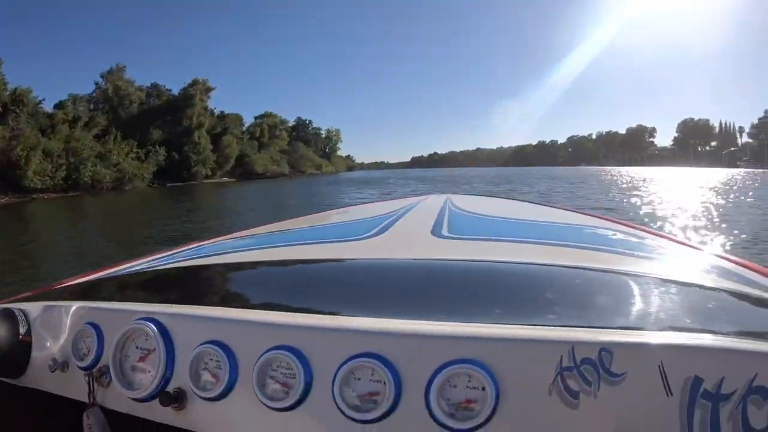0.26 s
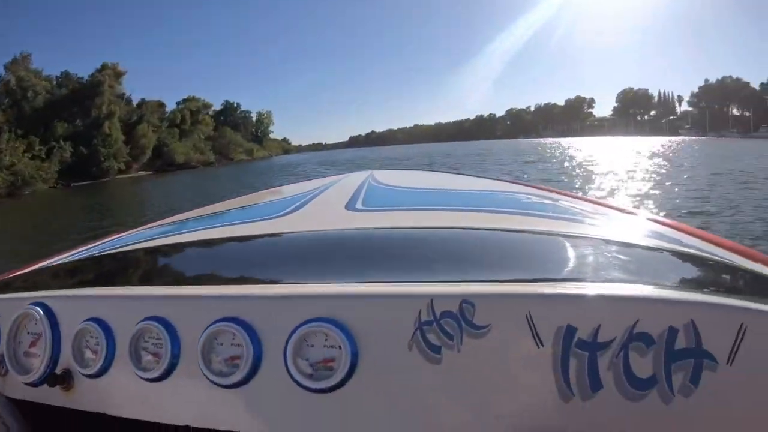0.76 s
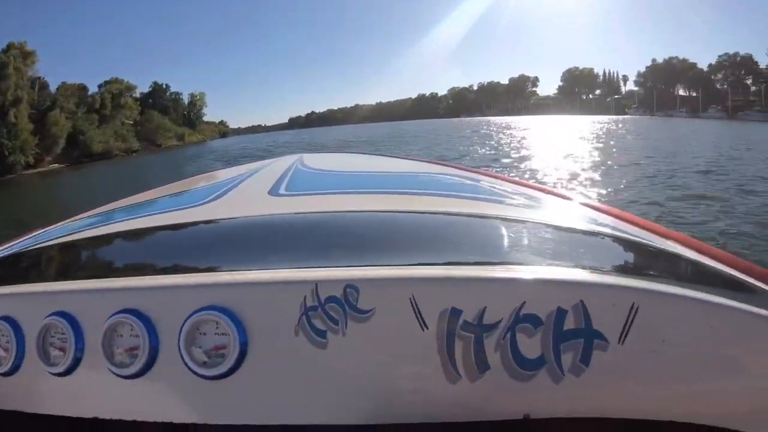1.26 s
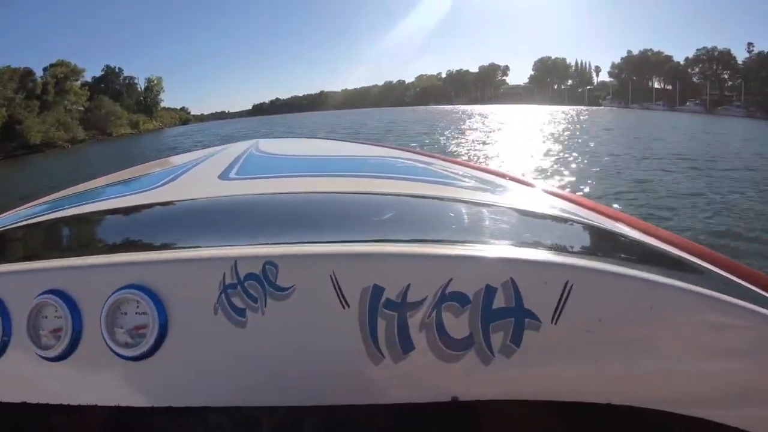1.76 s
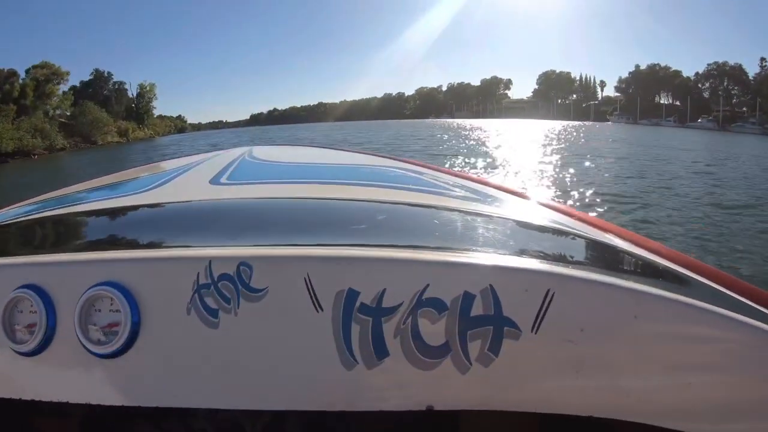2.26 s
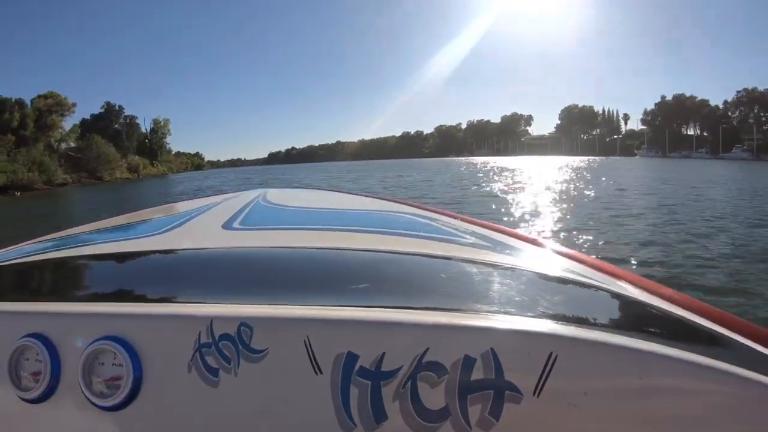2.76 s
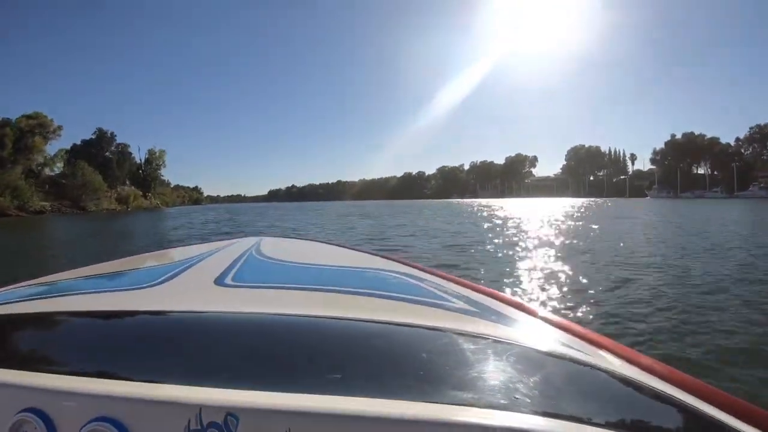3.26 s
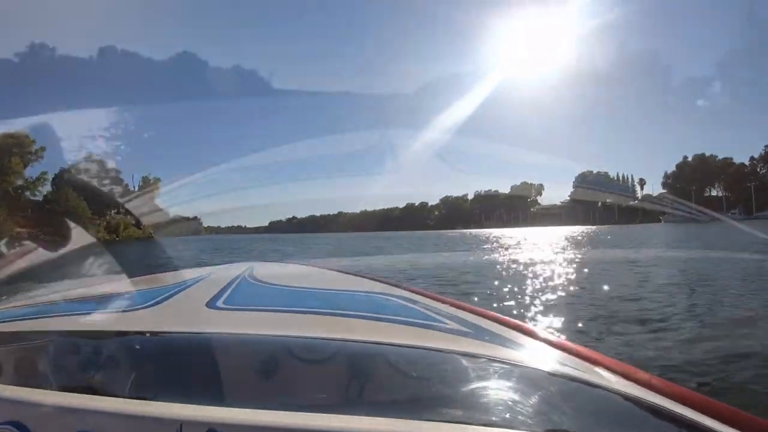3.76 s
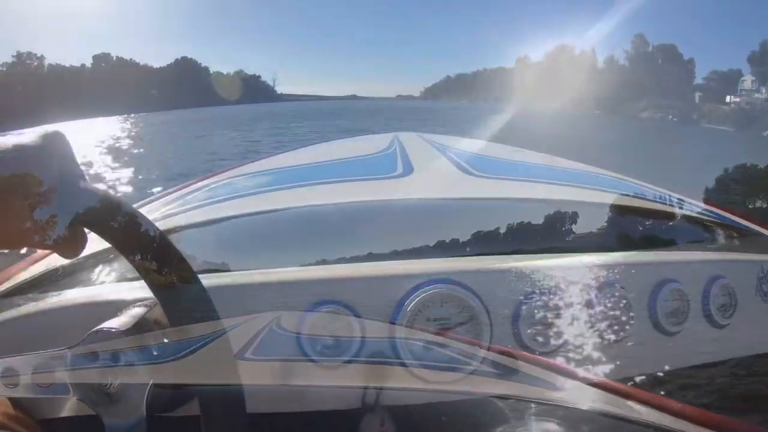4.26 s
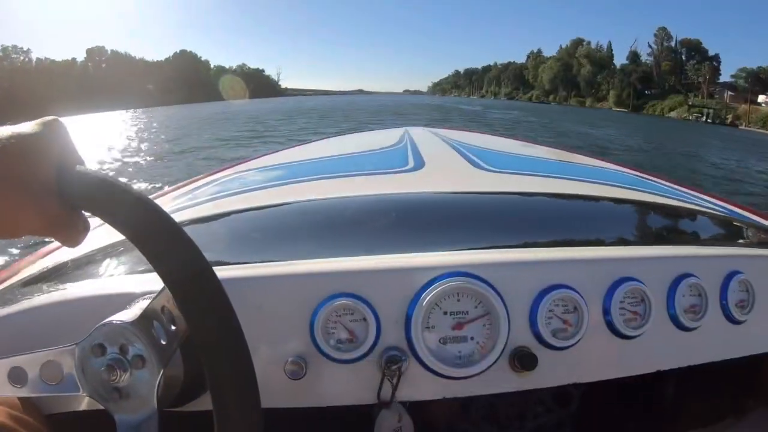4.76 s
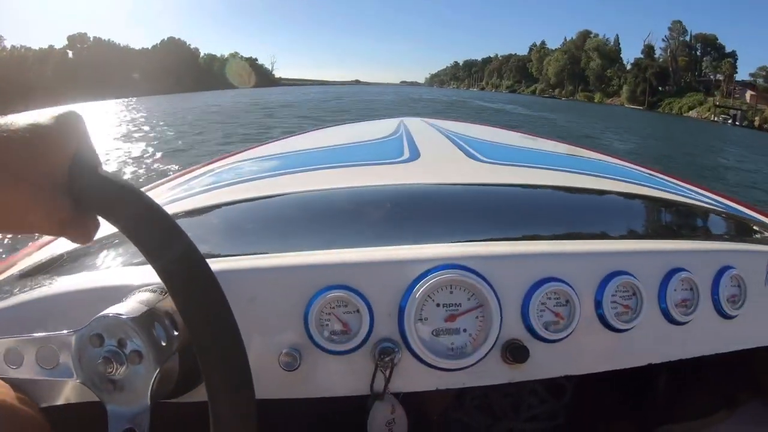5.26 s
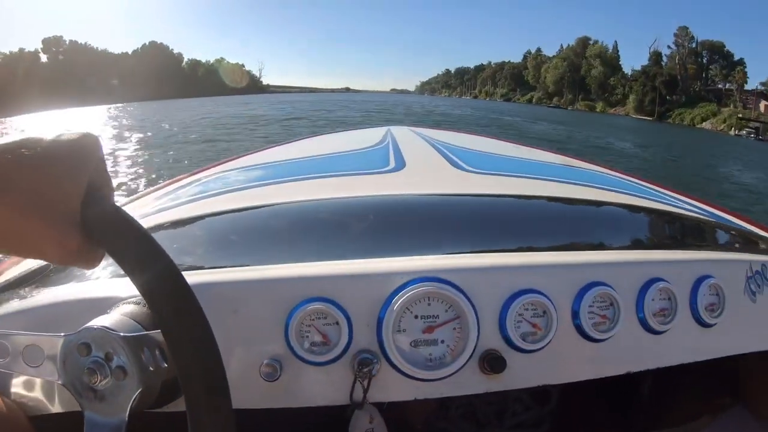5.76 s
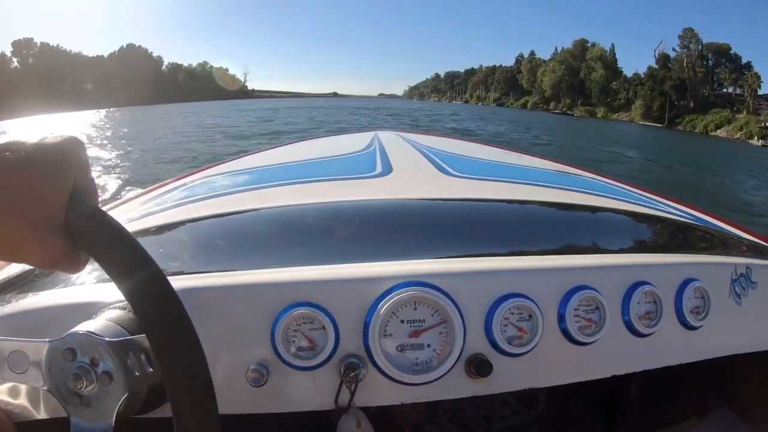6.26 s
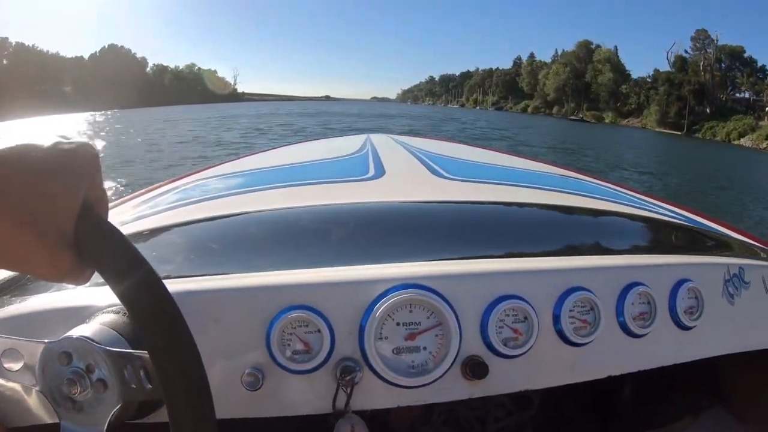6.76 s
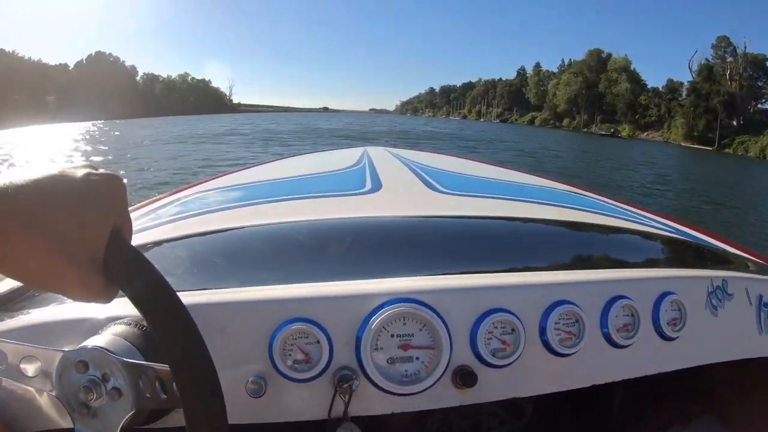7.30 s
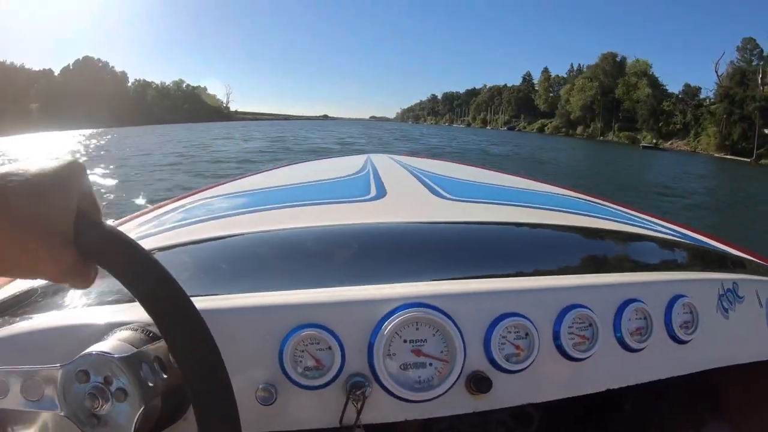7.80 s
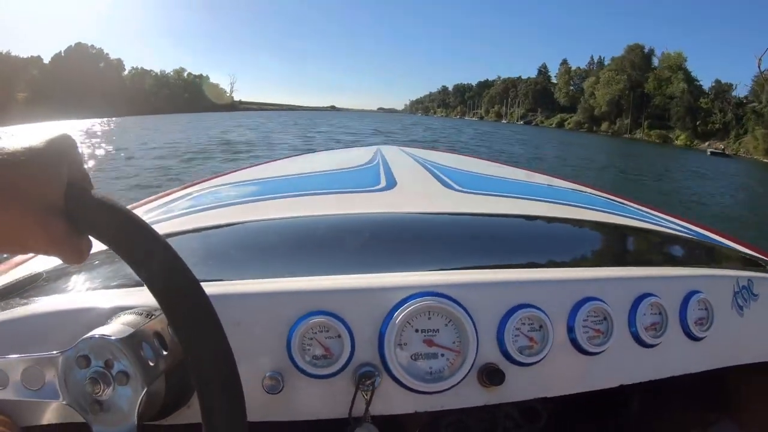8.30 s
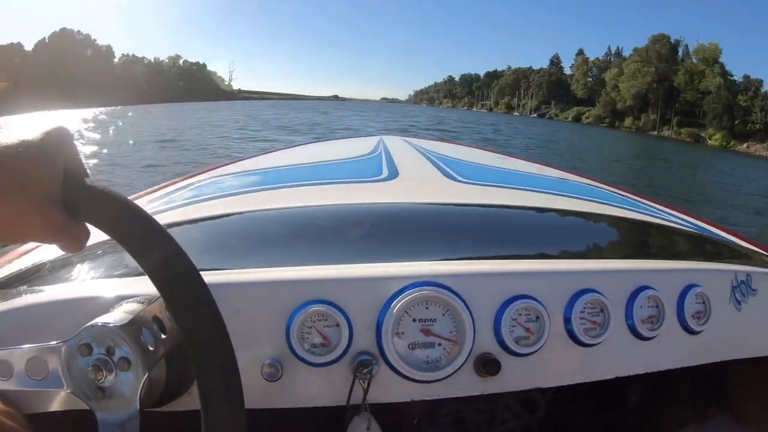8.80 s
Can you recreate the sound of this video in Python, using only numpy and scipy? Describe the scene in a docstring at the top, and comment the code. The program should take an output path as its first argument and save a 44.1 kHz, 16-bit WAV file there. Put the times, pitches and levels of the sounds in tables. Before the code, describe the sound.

From an open cockpit, a steady booming boat engine with light water slaps blends into a louder rushing cruise, then revs up quickly and holds.

```python
"""V8 jet boat on a river

Heard from the cockpit. At easy speed the hull booms on one engine order and the valves tick; this dissolves
into a faster stretch in which the throttle opens. The engine is built from sines on multiples of its cycle.
Wind buffets the microphone, exhaust and wake roar, spray hisses and fizzes along the hull: all shaped noise.
Sheets of water slapping the hull are short bursts of noise."""
import sys
import numpy as np
from scipy import signal
from scipy.fft import rfft, irfft
from scipy.io import wavfile
from scipy.ndimage import uniform_filter1d

SR = 44100
rng = np.random.default_rng(int(sys.argv[2]) if len(sys.argv) > 2 else 0)


def to_wav(sig):
    """Store sig (one row per channel, or 1-D mono) as 16-bit WAV at the path in sys.argv[1].

    Samples outside -1..1 are clipped; the rate is SR.
    """
    pcm = np.clip(np.atleast_2d(sig), -1, 1) * 32767
    pcm = np.round(pcm).astype(np.int16)
    wavfile.write(sys.argv[1], SR, pcm.T)  # frames by channels


def volts_from_db(level):
    """Convert decibel levels to linear amplitude ratios."""
    exponent = np.asarray(level, float) / 20
    return 10 ** exponent


N = 398663  # length in samples

# rush of water and exhaust past the boat: time_s, roar_db, spray_db, fizz_db
RUSH = [(0.0, -37, -53, -66), (0.15, -28.5, -49.5, -64), (0.7, -33.5, -49.5, -62.5),
        (1.08, -34, -50, -57.5), (1.34, -31, -52, -55.5), (1.56, -30.5, -38.5, -57.5),
        (1.72, -30.5, -45.5, -62), (1.85, -35, -52, -65), (2.62, -39.5, -52.5, -67.5),
        (2.97, -36.5, -47.5, -63.5), (3.6, -36.5, -52.5, -64), (3.93, -33, -45.5, -65.5),
        (4.6, -27, -40.5, -67), (5.22, -25.5, -40.5, -67), (5.5, -27.5, -42.5, -67.5),
        (6.36, -27.5, -44.5, -67), (6.63, -26, -36.5, -58.5), (7.08, -23.5, -37.5, -51.5),
        (7.3, -28, -40, -53), (7.75, -27.5, -36, -53), (8.43, -29, -37.5, -59), (9.04, -27.5, -37.5, -58)]
# how far the microphone has swung round: time_s, share (0-1)
FACING = [(0, 0.7), (1.5, 0.14), (1.95, 0), (3.15, 0.27), (3.35, .95), (4.6, 0.83)]


def evened(x):
    """Scales to an rms of 1."""
    return x / np.sqrt(np.mean(x ** 2) + 1e-20)


def shape(points, hz):
    """Gain of a spectrum table, read along log frequency and all but silent beyond its ends."""
    f, db = np.transpose(points)
    return volts_from_db(np.interp(np.log(hz + 1), np.log(f + 1), db, -120, -120))


def tint(x, points):
    """Filters by a spectrum table."""
    hz = np.fft.rfftfreq(len(x), 1 / SR)
    return irfft(rfft(x) * shape(points, hz), len(x))


def curves(rows, t):
    """Columns of a curve table at times t."""
    s, *columns = np.transpose(rows)
    return [np.interp(t, s, c) for c in columns]


def wander(count, rate):
    """Slow random curves of rms 1, changing about rate times a second."""
    knots = rng.standard_normal((count, 2000))  # 200 per second
    knots = uniform_filter1d(knots, max(round(100 / rate), 1), axis=1)
    at = np.arange(N) * 200 / SR
    return [np.interp(at, np.arange(2000), evened(k)) for k in knots]


def dissolve(t):
    """Share of the fast stretch, 0 to 1."""
    # span of the dissolve: start_s, end_s
    span = 3.37, 4.62
    start_s, end_s = span
    return np.clip((t - start_s) / (end_s - start_s), 0, 1)


def tones(rate, order_db, waver_db, slip):
    """Sines on the multiples of the cycle; uneven burning makes each waver in size (dB) and phase (rad)."""
    turns = 2 * np.pi * np.cumsum(rate) / SR
    sizes = wander(count=len(order_db), rate=9)
    phases = wander(count=len(order_db), rate=5)
    starts = 2 * np.pi * rng.random(len(order_db))
    total = np.zeros(N)
    for k, (db, size, phase, start) in enumerate(zip(order_db, sizes, phases, starts)):
        total += volts_from_db(db + waver_db * size) * np.sin((k + 1) * turns + start + slip * phase)
    return np.sqrt(2) * total


def easy_orders(t, rate):
    """The fifth order booms in the hull; the other orders change balance as the microphone swings round."""
    # exhaust and hull tones before the swing: cycle_multiple, relative_db
    ahead = [(1, -27), (2, -24), (3, -19.5), (4, -12.5), (5, 0), (6, -24.5), (7, -25.5), (8, -21.5),
             (9, -29), (10, -34.5), (11, -35), (12, -38.5), (13, -31), (14, -28), (15, -32), (16, -36.5),
             (17, -40.5), (18, -35), (19, -39), (20, -37.5), (21, -38.5), (22, -40), (23, -37), (24, -30),
             (25, -32.5), (26, -36), (27, -36), (28, -41), (29, -38), (30, -40.5)]
    # the same tones once the microphone has swung round: cycle_multiple, relative_db
    swung = [(1, -30.5), (2, -24.5), (3, -18.5), (4, -14.5), (5, -1), (6, -19.5), (7, -26), (8, -12.5),
             (9, -26.5), (10, -30), (11, -26), (12, -32.5), (13, -22), (14, -17), (15, -30.5), (16, -34.5),
             (17, -38.5), (18, -41.5), (19, -47), (20, -40.5), (21, -33), (22, -37.5), (23, -31),
             (24, -25.5), (25, -34), (26, -36), (27, -29), (28, -37.5), (29, -36), (30, -37.5)]
    # brief swells of the firing order: centre_s, swell_db
    swells = [(1.0, 4), (1.95, 5), (2.45, 13), (2.93, 10), (3.55, 4.7)]
    swell_s, rest_db = 0.13, -4.5  # spread of a swell; offset of the firing order between swells
    facing = np.clip(curves(FACING, t)[0], 0, 1)
    load_db = rest_db + sum(db * np.exp(-((t - s) / swell_s) ** 2) for s, db in swells)
    boom_db = [db if k == 5 else -120 for k, db in ahead[:5]]
    boom = tones(rate, boom_db, waver_db=0.0, slip=0.19)
    order_db = []
    for (k, a), (_, b) in zip(ahead, swung):
        # eight firings a cycle make order 8 the firing order; order 5 is left to the boom
        order_db.append((1 - facing) * a + facing * b + (k == 8) * load_db - (k == 5) * 120)
    return boom + tones(rate, order_db, waver_db=2.2, slip=0.17)


def valve_ticks(t, rate):
    """Each firing adds a short metallic tick of its cylinder's size: a noisy rattle over a ringing valve cover."""
    # valve tick of each cylinder in firing order: relative_db
    cylinders = [-48, -38, -55, -48, -57, -57, -43, -57]
    # spectrum of the ticks: frequency_hz, relative_db_per_hz
    colour = [(3200, -26), (3900, -4), (4500, -6), (5200, -2), (6000, 0), (7000, -19)]
    # gain of the ticks: time_s, gain_db
    gains = [(0, 4.5), (.7, 3), (.82, 11.5), (1.05, 7), (1.2, 3), (2.2, 2.5), (2.5, 5.5), (3, 8),
             (3.65, 6.5), (4.6, 6)]
    firing = np.floor(8 * np.cumsum(rate) / SR).astype(int)
    at = np.flatnonzero(np.diff(firing))
    gate = np.zeros(N)
    gate[at] = volts_from_db(np.take(cylinders, firing[at] % 8) + 2.5 * rng.standard_normal(len(at)))
    burst = np.exp(-np.arange(300) / (0.0014 * SR))  # 1.4 ms decay
    ring = burst * np.sin(2 * np.pi * 5100 * np.arange(300) / SR)
    rattle = signal.oaconvolve(gate, burst)[:N] * rng.standard_normal(N)
    ringing = signal.oaconvolve(gate * rng.choice([-1, 1], N), ring)[:N]
    return volts_from_db(curves(gains, t)[0]) * tint(rattle + 0.6 * ringing, colour)


def easy_engine(t):
    """Engine at easy speed, creeping up; one cycle is two crank turns and eight firings."""
    # engine level: time_s, level_db
    levels = [(0, -13.5), (.5, -14), (1, -12), (1.95, -12.5), (2.2, -11), (2.6, -13), (2.92, -12),
              (3.15, -13), (3.6, -9.5), (4.6, -11)]
    rate = 25.95 + 0.075 * t  # cycles per s
    return volts_from_db(curves(levels, t)[0]) * easy_orders(t, rate) + valve_ticks(t, rate)


def fast_engine(t):
    """The order pattern shifts from cruise to full as the speed rises; load lifts the firing order."""
    # exhaust and hull tones at cruise: cycle_multiple, relative_db
    cruise = [(1, -16), (2, -0.5), (3, -4), (4, -16), (5, -10.5), (6, -23.5), (7, -11.5), (8, -6),
              (9, -9.5), (10, -17.5), (11, -4.5), (12, -18), (13, -8.5), (14, -17.5), (15, -22.5),
              (16, -20), (17, -29), (18, -27.5), (19, -33.5), (20, -27), (21, -29), (22, -32.5), (23, -22),
              (24, -21.5), (25, -20), (26, -20.5), (27, -23.5), (28, -25.5), (29, -27), (30, -24),
              (31, -29), (32, -34.5), (33, -27), (34, -26.5)]
    # exhaust and hull tones at full throttle: cycle_multiple, relative_db
    full_throttle = [(1, -17.5), (2, -0.5), (3, 0), (4, -4), (5, -11), (6, -10), (7, -12), (8, -0.5),
                     (9, -11.5), (10, -10), (11, -14), (12, -17), (13, -14.5), (14, -15), (15, -32),
                     (16, -20.5), (17, -27), (18, -22), (19, -12.5), (20, -18), (21, -17), (22, -25),
                     (23, -17.5), (24, -20), (25, -27), (26, -24.5), (27, -17), (28, -21.5), (29, -22),
                     (30, -23.5), (31, -24), (32, -28), (33, -28.5), (34, -32)]
    # engine speed: time_s, cycles_per_s
    speeds = [(6.92, 29.6), (6.98, 31.2), (7.08, 33.8), (7.17, 34.6), (7.41, 36.7), (7.55, 37.08),
              (7.86, 36.5), (8.33, 37.0), (9.04, 36.76)]
    # engine level: time_s, level_db
    levels = [(3.6, -22.5), (4.6, -25.5), (6.4, -19.5), (6.9, -21.5), (7.16, -19.5), (7.6, -20),
              (9.04, -18.5)]
    cruise_rate, full_rate = 29.6, 36.0  # cycles per s
    throttle_s, surge_db, surge_s = 6.92, 7.5, 0.22  # throttle opens; peak of the load, time to that peak
    rate = curves(speeds, t)[0]
    opened = np.maximum(t - throttle_s, 0) / surge_s
    load_db = surge_db * opened * np.exp(1 - opened)
    full = np.clip((rate - cruise_rate) / (full_rate - cruise_rate), 0, 1)
    order_db = [(1 - full) * a + full * b + (k == 8) * load_db
                for (k, a), (_, b) in zip(cruise, full_throttle)]
    return volts_from_db(curves(levels, t)[0]) * tones(rate, order_db, waver_db=1.2, slip=0.15)


def splashes(t):
    """Sheets of water slap the hull: wide noise that starts at once, holds and drops away."""
    # slaps: start_s, relative_db, length_s
    slaps = [(1.357, -31, .035), (1.41, -31, .07), (1.955, -33, .055), (2.137, -31, .028)]
    # spectrum of the slaps: frequency_hz, relative_db_per_hz
    colour = [(300, -6), (1000, 4.5), (2000, -3.5), (3300, -13), (4200, -8), (6500, -11.5), (7200, -25.5),
              (9500, -47), (15500, -70)]
    gate = sum(volts_from_db(db) * (t > s) / (1 + ((t - s) / length) ** 4) for s, db, length in slaps)
    return uniform_filter1d(gate, size=100) * evened(tint(rng.standard_normal(N), colour))


def rush(size, colour, level, band, patchy_db, flicker_db):
    """Random short-time spectra with drifting patches and gust flicker; level(t) sets the dB in band (Hz)."""
    hop = size // 4
    frames, hz = N // hop + 5, np.fft.rfftfreq(size, 1 / SR)
    t = np.arange(frames) * hop / SR
    real, imaginary, patches = rng.standard_normal((frames, len(hz), 3)).T
    patches = uniform_filter1d(patches, size // 64, axis=0)  # across frequency
    patches = evened(uniform_filter1d(patches, 8192 // size, axis=1))  # across time
    flicker = evened(uniform_filter1d(rng.standard_normal(frames), size=3))
    gain = colour(hz, t)
    inside = (hz > band[0]) & (hz < band[1])
    gain = gain / np.sqrt((gain[inside] ** 2).sum(0))
    gain = gain * volts_from_db(patchy_db * patches + flicker_db * flicker + level(t))
    spectra = (real + 1j * imaginary) * gain
    return signal.istft(spectra, nperseg=size, noverlap=size - hop)[1][:N]


def steady(points):
    """Colour for rush() that keeps one spectrum table throughout."""
    return lambda hz, t: shape(points, hz)[:, None]


def roar_colour(hz, t):
    """Blends the two stretches, tilts the treble; facing round dulls it and opens a gap near 480 Hz."""
    # roar of the easy stretch: frequency_hz, relative_db_per_hz
    easy_points = [(100, -4.5), (250, -7), (480, -5.5), (700, -7.5), (1200, -12.5), (2000, -20),
                   (2700, -24), (3300, -28.5), (5000, -46)]
    # roar of the fast stretch: frequency_hz, relative_db_per_hz
    fast_points = [(100, -4.5), (300, -1), (600, -9), (1000, -8.5), (1400, -13), (2000, -16), (2600, -21.5),
                   (3200, -30.5), (5000, -44.5)]
    easy_tilt, facing_tilt, fast_tilt = 2.0, -7.5, -1.5  # dB per octave above 1 kHz
    facing, fast = curves(FACING, t)[0], dissolve(t)
    gap = volts_from_db(-12.0 * np.outer(np.exp(-((hz - 480) / 70) ** 2), facing))
    easy_part = np.outer(shape(easy_points, hz), 1 - fast) * gap
    fast_part = np.outer(shape(fast_points, hz), fast)
    tilt = (1 - fast) * (easy_tilt + facing_tilt * facing) + fast * fast_tilt
    octaves = np.log2(np.maximum(hz / 1000, 1))
    return (easy_part + fast_part) * volts_from_db(np.outer(octaves, tilt))


def roar():
    """Exhaust and wake: broad noise whose colour changes across the dissolve and with the microphone's facing."""
    return rush(size=1024, colour=roar_colour, level=lambda t: curves(RUSH, t)[0],
                band=(800, 2800), patchy_db=0.85, flicker_db=0.32)


def spray():
    """Spray hissing along the hull: patchy noise, strongest around 4 to 6 kHz."""
    # spectrum of the spray: frequency_hz, relative_db_per_hz
    colour = [(2500, -32.5), (3400, -11), (3800, -3.5), (4200, 1.5), (5000, -2), (6500, -5.5),
              (6900, -17.5), (7500, -27), (8500, -40.5)]
    return rush(size=256, colour=steady(colour), level=lambda t: curves(RUSH, t)[1],
                band=(3800, 6800), patchy_db=1.0, flicker_db=1.57)


def fizz():
    """Fizz of the spray: patchy noise that reaches higher in the treble."""
    # spectrum of the fizz: frequency_hz, relative_db_per_hz
    colour = [(2500, -2.5), (4000, -3), (6500, 3), (7300, -3), (8200, -4.5), (9000, -12), (10000, -23),
              (12000, -34), (15500, -42)]
    return rush(size=256, colour=steady(colour), level=lambda t: curves(RUSH, t)[2],
                band=(7300, 9500), patchy_db=1.5, flicker_db=1.5)


def gusty_rush():
    """Roar, spray and fizz, each swayed by its own quick random gusts."""
    # depth of the gusts in roar, spray and fizz: rms_db
    depths = .4, 1., .6
    layers = roar(), spray(), fizz()
    gusts = wander(count=3, rate=9)
    return sum(volts_from_db(depth * gust) * layer for depth, gust, layer in zip(depths, gusts, layers))


def wind():
    """Wind buffeting the microphone: low noise in drifting patches."""
    # spectrum of the wind: frequency_hz, relative_db_per_hz
    colour = [(15, -15), (35, -7), (60, -0.5), (110, 0.5), (200, -9.5), (400, -21), (800, -44)]
    # strength of the wind: time_s, wind_db
    breeze = [(0, -26.5), (.4, -24), (1, -28), (2.4, -30), (3, -29), (3.5, -38.5), (4.3, -25), (6.5, -24.5),
              (6.95, -20.5), (7.2, -26), (7.8, -26.5), (9.04, -25)]
    return rush(size=4096, colour=steady(colour), level=lambda t: curves(breeze, t)[0],
                band=(25, 70), patchy_db=0.43, flicker_db=0.75)


def scene():
    """Both stretches of engine over splashes, roar, spray, fizz and wind, in mono."""
    t = np.arange(N) / SR
    fast = dissolve(t)
    engine = (1 - fast) * easy_engine(t) + fast * fast_engine(t)
    return (engine + splashes(t) + gusty_rush() + wind())[None]


def roll_off(x):
    """The treble ends steeply here."""
    return signal.sosfilt(signal.butter(12, 15700, fs=SR, output="sos"), x)


def record(dry):
    """A soft overload rounds off the loudest peaks."""
    mix = np.tanh(dry / 1.3) * 1.3
    return roll_off(mix)


dry = scene()
out = record(dry)
to_wav(out)
```